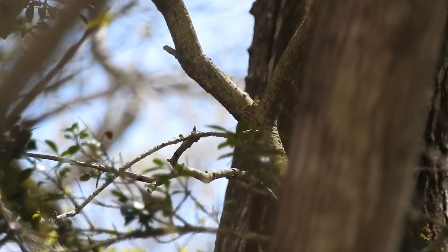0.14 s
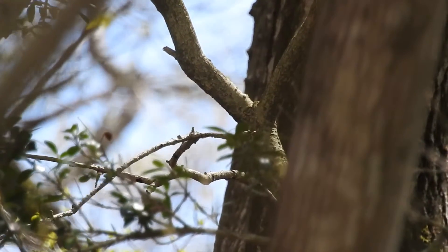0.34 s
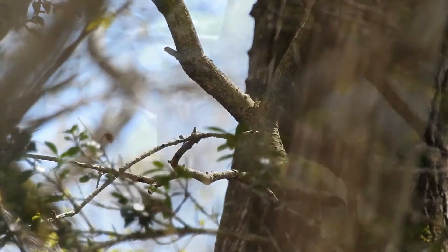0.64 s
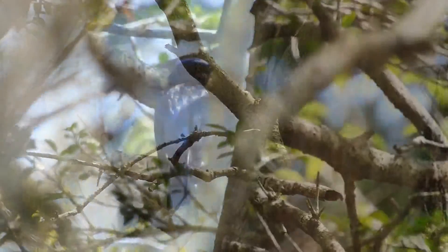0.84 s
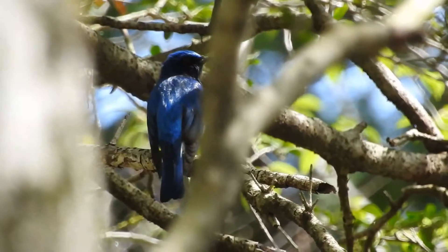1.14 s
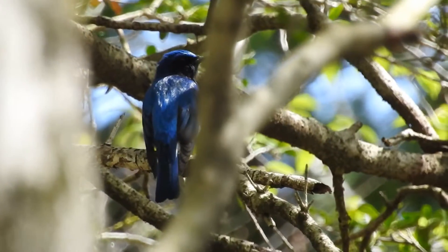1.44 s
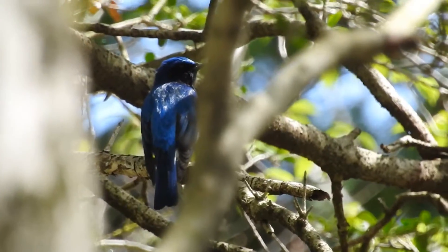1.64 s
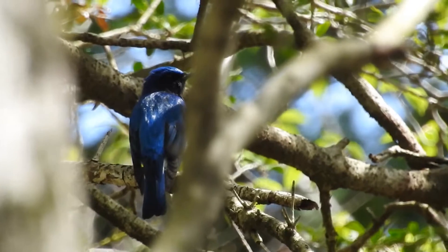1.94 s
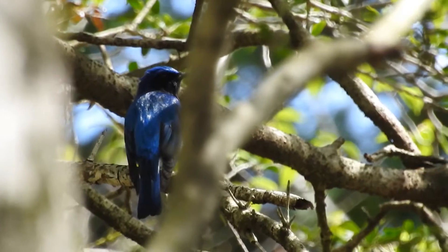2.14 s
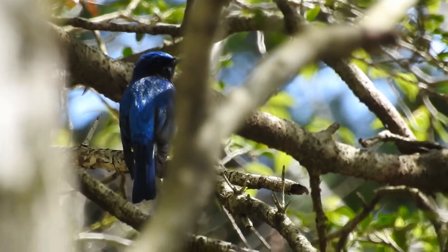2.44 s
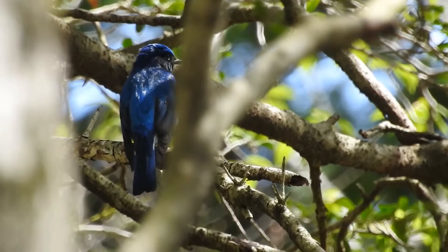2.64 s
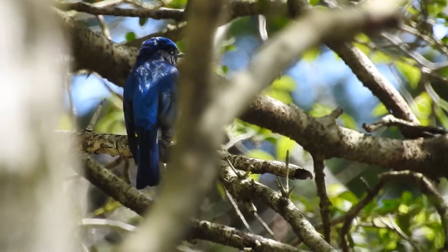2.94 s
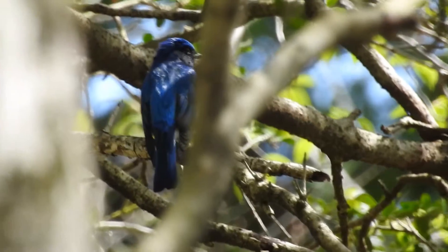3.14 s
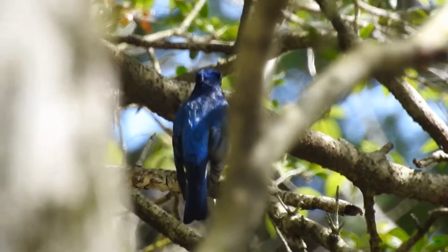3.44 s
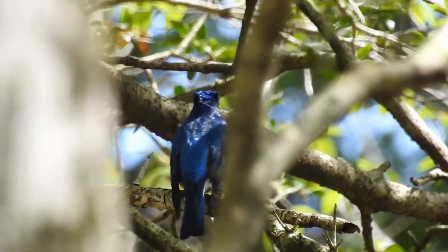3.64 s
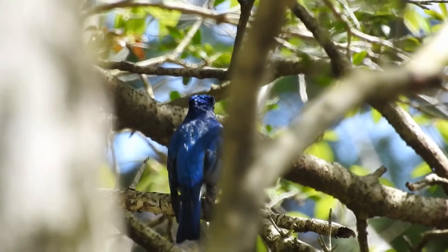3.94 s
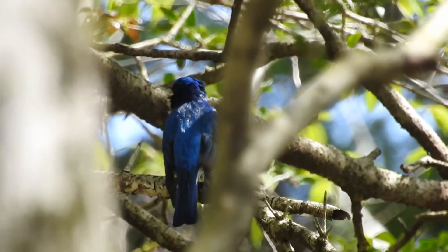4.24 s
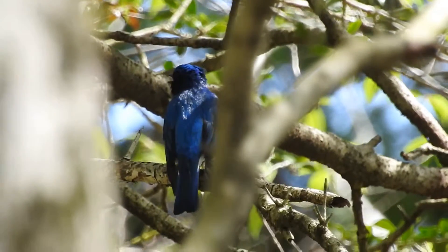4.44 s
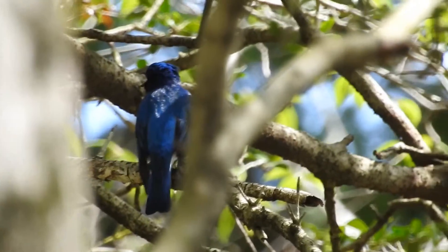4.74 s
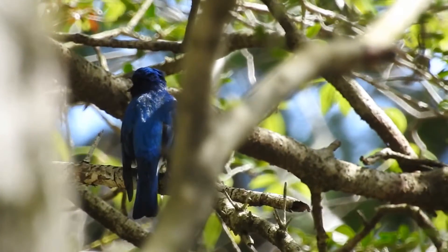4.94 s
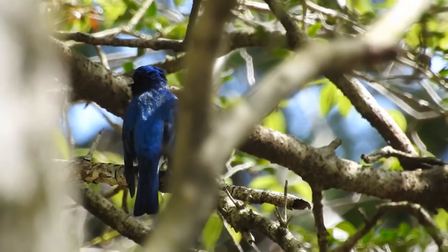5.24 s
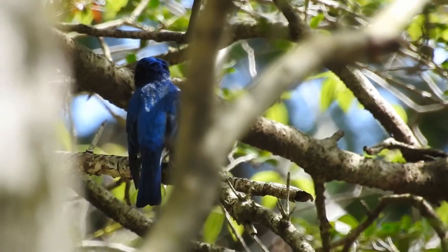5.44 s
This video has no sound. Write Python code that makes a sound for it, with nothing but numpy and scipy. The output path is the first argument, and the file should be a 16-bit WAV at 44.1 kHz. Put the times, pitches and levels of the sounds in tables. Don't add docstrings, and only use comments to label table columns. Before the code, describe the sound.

A warbler's hurried whistles give way to an echoing wood, where a blue flycatcher whistles a clear falling phrase ending in a thin buzz.

```python
import sys
import numpy as np
from scipy import signal
from scipy.io import wavfile
from scipy.ndimage import uniform_filter1d

SR = 44100
rng = np.random.default_rng(int(sys.argv[2]) if len(sys.argv) > 2 else 0)


def bounce(signal):
    frames = np.transpose(np.atleast_2d(signal))
    limited = np.clip(frames, -1, 1)
    pcm = np.round(limited * 32767).astype(np.int16)
    wavfile.write(sys.argv[1], SR, pcm)


def volts_from_decibels(level):
    exponent = np.asarray(level, float) / 20
    return 10 ** exponent


N = 246959


def evened(x):
    return x / np.sqrt(np.mean(x ** 2) + 1e-20)


def wobble(count, smooth):
    drift = uniform_filter1d(rng.standard_normal(count), size=smooth)
    return evened(uniform_filter1d(drift, size=smooth))


def read(points, hz):
    f, value = np.transpose(points)
    return np.interp(np.log(hz + 1), np.log(f + 1), value)


def level(curve, outside_db=-120):
    s, db = np.transpose(curve)
    return volts_from_decibels(np.interp(np.arange(N) / SR, s, db, outside_db, outside_db))


def add(mix, s, sound):
    part = mix[round(s * SR):][:len(sound)]
    part += sound[:len(part)]


def bursts(rows, quiet_db, edge_s):
    gain = np.zeros(N)
    for s, length, db in rows:
        add(gain, s, volts_from_decibels(db) * np.ones(round(length * SR)))
    return uniform_filter1d(gain, size=round(edge_s * SR)) + volts_from_decibels(quiet_db)


# f/Hz, likeness
LIKENESS = [(60, 1), (150, 0.91), (380, 0.67), (950, 0.48), (2380, 0.22), (5980, 0.098), (15000, 0.075)]


def air(spectrum, patchy_db, band=(0, 22050), size=1024):
    frames, hz = 4 * N // size + 5, np.fft.rfftfreq(size, 1 / SR)
    a, b, c, d, patches = rng.standard_normal((frames, len(hz), 5)).T
    patches = uniform_filter1d(patches, size=10, axis=0)
    patches = evened(uniform_filter1d(patches, size=12, axis=1))
    same = np.clip(read(LIKENESS, hz), -1, .9)[:, None]
    left = a + 1j * b
    right = same * left + np.sqrt(1 - same ** 2) * (c + 1j * d)
    tilt_db = read(spectrum, hz)
    power = volts_from_decibels(2 * tilt_db)
    share = power[(hz >= band[0]) & (hz <= band[1])].sum() / power.sum()
    z = np.array([left, right]) * volts_from_decibels(tilt_db[:, None] + patchy_db * patches)
    noise = signal.istft(z, nperseg=size, noverlap=3 * size // 4)[1][:, :N]
    return evened(noise) / np.sqrt(share)


# f/Hz, level/dB per Hz
WASH_SPECTRUM = [(59, -66), (100, -45), (140, -10.5), (210, -1), (275, -7.5), (359, -9), (1350, -21),
                 (2500, -37), (3250, -51), (5500, -120)]
# t/s, level/dB
WASH_LEVEL = [(0.0, -52.5), (0.024, -46.5), (.5, -47), (1.13, -49)]


def first_wash():
    return level(WASH_LEVEL) * air(WASH_SPECTRUM, 2.3, band=(120, 1500))


# f/Hz, level/dB per Hz
HISS_SPECTRUM = [(76, -37.5), (130, 0), (198, -6), (440, -17.5), (697, -16), (802, -20), (887, -30.5),
                 (2560, -26), (4300, -18), (6420, -18), (12200, -32.5), (14600, -35), (15500, -55.5)]
# t/s, level/dB
HISS_LEVEL = [(0, -55), (.5, -52.5), (1.15, -54), (5.6, -53.5)]


def hiss():
    return level(HISS_LEVEL) * air(HISS_SPECTRUM, 1.44)


# f/Hz, level/dB per Hz
RUMBLE_SPECTRUM = [(15, -49), (25, -31), (41, -6.5), (75, 0.5), (92, -1), (161, -18.5), (200, -10),
                   (260, -30), (440, -120)]
# t/s, level/dB
RUMBLE_LEVEL = [(0.0, -52), (0.11, -60.5), (0.25, -42), (0.33, -59), (0.67, -70), (1.34, -51.5),
                (2.06, -51.5), (2.09, -44), (2.23, -51), (2.4, -46.5), (2.48, -49.5), (3.71, -51.5),
                (3.79, -42), (3.82, -53.5), (4.57, -49), (5.6, -52)]


def rumble():
    noise = air(RUMBLE_SPECTRUM + [(400, -92.0)], 1.0, band=(40, 110), size=4096)
    return volts_from_decibels(0.64) * level(RUMBLE_LEVEL) * noise


# f/Hz, level/dB per Hz
LEAF_SPECTRUM = [(250, 5.5), (600, -2), (1500, -3.5), (3000, -8), (7000, -30), (12000, -21.5)]
# t/s, length/s, level/dB
LEAF_STIRS = [(1.13, 0.0644, -65), (1.27, 0.058, -66), (1.36, 0.047, -62), (1.44, 0.13, -64.5),
              (1.66, .03, -65), (1.73, 0.081, -69.5), (1.89, 0.16, -64), (2.23, 0.061, -63),
              (2.47, 0.074, -67), (2.56, 0.08, -62), (2.97, 0.056, -63.5), (3.07, 0.056, -64.5),
              (3.18, 0.046, -70), (3.46, 0.13, -65), (4.77, 0.024, -62), (4.89, 0.052, -65),
              (5.02, 0.048, -66), (5.13, 0.059, -62.5), (5.32, 0.037, -62), (5.51, 0.08, -60.5)]


def leaves():
    after_change = level([(1.1, -31), (1.14, 1.5), (5.6, 0)])
    stirs = bursts(LEAF_STIRS, quiet_db=-66, edge_s=0.03)
    return volts_from_decibels(-1.42) * after_change * stirs * air(LEAF_SPECTRUM, 2.7, band=(900, 2400))


# t/s, length/s, level/dB
HOOT_PUFFS = [(1.287, 0.048, -65), (1.448, 0.038, -63), (1.513, 0.041, -60), (1.641, 0.066, -65.5),
              (1.764, 0.023, -69), (1.937, 0.057, -66), (2.131, 0.031, -62), (2.226, 0.03, -61),
              (2.327, 0.035, -57.5), (2.408, 0.04, -65), (2.597, 0.033, -64), (2.665, 0.1, -71),
              (2.974, 0.069, -63), (3.086, 0.14, -61.5), (3.384, 0.25, -66.5), (3.62, 0.04, -67),
              (3.884, 0.046, -67.5), (4.345, 0.098, -66.5), (4.563, 0.033, -59.5), (4.857, 0.1, -66),
              (5.015, 0.044, -62), (5.108, 0.038, -71), (5.169, 0.077, -67.5), (5.361, 0.072, -66),
              (5.537, 0.054, -64)]


def hoot(hz=802, width_hz=25, steady=.5):
    r, turn = np.exp(-np.pi * width_hz / SR), np.exp(2j * np.pi * hz * np.arange(N) / SR)
    slow = signal.lfilter([1 - r], [1, -r], rng.standard_normal((N, 2)) @ [1, 1j])
    slow = slow / np.std(slow) + steady
    puffs = bursts(HOOT_PUFFS, quiet_db=-71.5, edge_s=0.023)
    return volts_from_decibels(-1.0) * puffs * evened((turn * slow).real)


# t/s, length/s, level/dB, f/Hz
KNOCKS = [
    (.0, 0.019, -45, 150),
    (.02, 0.017, -38, 166),
    (.046, 0.029, -44, 187.4),
    (.09, 0.016, -47, 164),
    (.108, 0.028, -50, 314),
]


def bump():
    out = np.zeros(N)
    for s, length, db, hz in KNOCKS:
        t = np.arange(0, length, 1 / SR)
        swell = 2 * np.sin(np.pi * t / length)
        add(out, s, volts_from_decibels(db) * swell * np.sin(2 * np.pi * hz * t))
    return out


# f/Hz, t60/s
TRUNK_RING = [(2500, 1.85), (4500, 1.57), (8000, 0.7)]


def wood(x, ring, build_s, branches_db=2.0, branches_t60=0.32, alike=0.31):
    taps = np.zeros((2, 2 * SR))
    at = np.arange(100, 2 * SR - 20, 20) + rng.integers(0, 20, (2, (2 * SR - 101) // 20))
    np.put_along_axis(taps, at, rng.choice([-1., 1.], at.shape), 1)
    taps[1] = alike * taps[0] + np.sqrt(1 - min(alike, 1) ** 2) * taps[1]
    hz, t, z = signal.stft(taps, SR, nperseg=256)
    trunks = volts_from_decibels(-60 * t / (ring * read(TRUNK_RING, hz)[:, None]))
    branches = volts_from_decibels(branches_db - 60 * t / branches_t60)
    build = 1 - np.exp(-t / build_s)
    tail = signal.istft(z * (trunks + branches) * build, SR, nperseg=256)[1]
    echoes = signal.fftconvolve(x[None], tail / np.linalg.norm(tail[0]), axes=1)[:, :N]
    return echoes * volts_from_decibels(1.7 * wobble(N, smooth=280))


def placed(x, pan_db, wet_db, ring, alike=0.46, blur=.6, build_s=.008):
    smeared = x * (np.sqrt(1 - blur ** 2) + blur * wobble(N, smooth=160))
    heard = x + volts_from_decibels(wet_db) * wood(smeared, ring, build_s, alike=alike)
    return heard * volts_from_decibels([[pan_db / 2], [-pan_db / 2]])


# f/Hz, level/dB
OCTAVE = [(3300, -30.5), (4400, -50), (6000, -43)]


def whistle(rows, waver=0.0023, flutter_db=2.0, trill=0):
    s, hz, db = np.transpose(rows)
    t = np.arange(s[0], s[-1], 1 / SR)
    glide = uniform_filter1d(np.interp(t, s, hz), size=130, mode="nearest")
    bend = waver * wobble(len(t), smooth=220) + trill * wobble(len(t), smooth=50)
    turn = 2 * np.pi * np.cumsum(glide * (1 + bend)) / SR
    overtones = np.sin(2 * turn) + .3 * np.sin(3 * turn)
    tone = np.sin(turn) + volts_from_decibels(read(OCTAVE, glide)) * overtones
    loud = volts_from_decibels(np.interp(t, s, db) + flutter_db * wobble(len(t), smooth=350))
    edges = signal.windows.tukey(len(t), min(1, 200 / len(t)))
    return s[0], np.sqrt(2) * tone * loud * edges


def flock(songs, trill, wet_db, ring, pan_db=-2.0):
    voice = np.zeros(N)
    for syllable, calls in songs:
        usual_hz = syllable[0][0][1]
        for s, db, hz in calls:
            for stroke in syllable:
                rows = np.array(stroke) * [1, hz / usual_hz, 1] + [s, 0, db]
                add(voice, *whistle(rows, waver=0.0043, flutter_db=2.5, trill=trill))
    return placed(voice, pan_db, wet_db, ring)


# t/s after the start, f/Hz, level/dB
TWIRL_SHAPE = [
    [(-.01, 4300, -9), (-.004, 4280, -6), (.002, 4150, -9), (.004, 4000, -16)],
    [(.002, 4300, -12), (.008, 5050, -6), (.018, 5400, -9), (.021, 5450, -16)],
    [(.015, 3900, -18), (.021, 4500, -8), (.027, 4850, -1), (.036, 5030, 0), (.047, 5480, -3),
     (.054, 5400, -2), (.062, 4950, -6)],
    [(.05, 5850, -16), (.06, 6050, -8), (.067, 6180, -4), (.075, 5750, -5), (.083, 5100, -3),
     (.092, 4650, -11)],
]
LIFT_SHAPE = [
    [(0, 3500, -8), (.03, 3900, -6), (.036, 3950, -18), (.043, 4150, 0), (.1, 4200, -2), (.2, 4270, -9),
     (.245, 4280, -5), (.26, 4290, -12)],
]
LILT_SHAPE = [
    [(0, 3200, -11), (.012, 3320, -8), (.03, 3580, -7), (.042, 3730, 0), (.054, 3750, -2), (.062, 3500, -6),
     (.07, 3400, -14)],
]
TSIP_SHAPE = [
    [(0, 6520, -16), (.008, 7300, -3), (.016, 7500, 0), (.024, 7100, -5), (.034, 6450, 2), (.044, 6900, -5),
     (.066, 6950, 1), (.085, 6800, -8)],
]
FALL_SHAPE = [
    [(0, 5250, -5), (.014, 5250, -8)],
    [(.02, 4900, -8), (.042, 4420, 0), (.06, 4060, -2), (.08, 4450, -7), (.1, 4150, -6), (.14, 4050, -11)],
    [(.09, 3200, -10), (.11, 3600, -7), (.13, 3300, -9), (.16, 3750, -9), (.19, 3400, -16)],
]
RISE_SHAPE = [
    [(0, 2950, -15), (.018, 3200, -8), (.04, 3480, -6), (.065, 3760, 0), (.09, 3720, -6)],
]
SLIDE_SHAPE = [
    [(0, 5050, -3), (.04, 4950, 0), (.1, 4700, -2), (.13, 4600, -10)],
]
PIPE_SHAPE = [
    [(0, 4270, 6), (.04, 4200, 0), (.1, 4250, 0), (.12, 4300, -14)],
]
DROP_SHAPE = [
    [(0, 4075, 2), (.012, 3400, 6), (.02, 3330, 0), (.05, 3400, -4), (.09, 3350, -8)],
]
WISP_SHAPE = [
    [(0, 5980, -5), (.03, 6620, 1), (.07, 7200, -7.5), (.1, 6800, -25)],
]
# t/s, level/dB, first f/Hz
TWIRL_CALLS = [(3.282, -44, 4280), (3.895, -43, 4300), (4.512, -41.5, 4190)]
LIFT_CALLS = [(2.725, -55.5, 3510)]
LILT_CALLS = [(3.399, -46.5, 3180)]
TSIP_CALLS = [(2.949, -57, 6500), (3.113, -55, 6490), (3.549, -51.5, 6430), (3.717, -53.5, 6500),
              (4.165, -49, 6500), (4.334, -53.5, 6520)]
FALL_CALLS = [(1.558, -56.5, 5250), (2.112, -56.5, 5200), (2.54, -64, 5150), (4.82, -56, 5200),
              (5.29, -54.5, 5230)]
RISE_CALLS = [(3.985, -53, 2880), (4.625, -53, 2874)]
SLIDE_CALLS = [(4.155, -57, 5060), (4.35, -62.5, 5100)]
FAINT_PIPE_CALLS = [(1.46, -69.5, 3480), (1.78, -72.5, 4480), (1.97, -76.5, 4470), (1.125, -67.5, 4210),
                    (1.14, -70, 3550), (2.42, -73.5, 4116), (2.6, -88, 4900),
                    (2.815, -73, 2760), (3.01, -72, 4520)]
DROP_CALLS = [(2.804, -61, 4074)]
WISP_CALLS = [(1.37, -60, 6020), (1.889, -63, 5900), (2.8, -65.5, 5650), (4.628, -60.5, 6050),
              (5.551, -64.5, 6020)]


def neighbours():
    near_songs = [(TWIRL_SHAPE, TWIRL_CALLS), (LIFT_SHAPE, LIFT_CALLS), (LILT_SHAPE, LILT_CALLS)]
    far_songs = [(FALL_SHAPE, FALL_CALLS), (RISE_SHAPE, RISE_CALLS), (SLIDE_SHAPE, SLIDE_CALLS)]
    farther_songs = [(PIPE_SHAPE, FAINT_PIPE_CALLS), (DROP_SHAPE, DROP_CALLS)]
    near = flock(near_songs, trill=.006, wet_db=-4, ring=.6)
    middle = flock([(TSIP_SHAPE, TSIP_CALLS)], trill=.012, wet_db=4, ring=1.0)
    far = flock(far_songs, trill=.011, wet_db=1, ring=.55)
    farther = flock(farther_songs, trill=.042, wet_db=6, ring=.3)
    farthest = flock([(WISP_SHAPE, WISP_CALLS)], trill=.06, wet_db=9, ring=.4)
    return near + middle + far + farther + farthest


def hook(start, length, db, top_hz, last_hz, scoop, scoop_s):
    peak, start_db, end_db = .45, -8, -10
    t = np.linspace(0, length, num=30)
    up = np.clip(1 - t / (scoop_s + 1 / SR), 0, 1) ** 2
    slide = np.clip((t - scoop_s) / (length - scoop_s), 0, 1)
    hz = (top_hz + (last_hz - top_hz) * slide) * (1 - scoop * up)
    away = t / length - peak
    arch_db = np.where(away < 0, start_db * (away / peak) ** 2, end_db * (away / (1 - peak)) ** 2)
    return np.transpose([start + t, hz, db + arch_db])


# t/s, length/s, level/dB, top f/Hz, last f/Hz
HOOK_NOTES = [(.305, 0.013, -53, 5800, 5600), (.331, 0.031, -45, 4750, 4660),
              (.425, 0.017, -40.5, 4680, 4740), (.45, 0.056, -40, 4200, 4200),
              (.632, 0.029, -41.5, 4420, 4400), (.708, 0.036, -36, 4230, 4196),
              (.984, 0.15, -54, 7550, 7430)]
SWOOP_NOTES = [
    (.543, 0.036, -39, 3690, 3100),
    (.74, 0.073, -39.5, 3790, 2873),
]
GRACE_NOTES = [(.314, 0.019, -54, 4220, 4360), (.322, 0.01, -49, 5850, 4500),
               (.33, 0.027, -51.5, 5730, 5747), (.35, .034, -40, 4880, 4930),
               (.397, 0.012, -47, 4970, 4930), (.412, .018, -52, 4800, 4860),
               (.763, 0.011, -38, 3500, 3300), (.437, 0.013, -48, 4070, 3770),
               (.507, 0.022, -37, 4710, 4760), (.522, 0.023, -35, 4770, 4250),
               (.545, 0.015, -40, 4570, 4830), (.592, 0.015, -50, 3190, 3210),
               (.615, .025, -52, 4680, 4720), (.662, 0.011, -43, 4370, 4250),
               (.672, 0.014, -39, 3870, 4100), (.728, 0.019, -40, 4220, 3710),
               (.742, 0.018, -38, 4225, 4200), (.838, 0.0094, -38, 4260, 4550),
               (.85, 0.044, -46, 4215, 3800), (1.08, .016, -56, 4200, 4020),
               (1.092, 0.0071, -68, 3920, 3580), (1.098, 0.0099, -50, 4080, 5150),
               (1.103, 0.009, -45, 5140, 5000), (1.112, 0.02, -54, 3790, 3950)]
RASP_NOTES = [
    (.83, 0.07, -55, 5700, 5520),
    (.98, 0.043, -49, 4650, 4570),
    (.985, 0.073, -57, 6050, 5930),
]
# t/s, gain level/dB
FIRST_SHOT_LEVEL = [(0, -1), (.7, 0), (.9, -2), (1.135, 0)]


def warbler():
    voice = np.zeros(N)
    # notes, scoop depth (share of pitch), scoop time (s), trill
    kinds = [(HOOK_NOTES, .16, .008, .007), (SWOOP_NOTES, .27, .012, .016),
             (GRACE_NOTES, 0, 0, .007), (RASP_NOTES, 0, 0, .04)]
    for notes, scoop, scoop_s, trill in kinds:
        for row in notes:
            add(voice, *whistle(hook(*row, scoop, scoop_s), waver=.003, flutter_db=2.2, trill=trill))
    return placed(voice, pan_db=-0.17, wet_db=-0.5, ring=0.56) * level(FIRST_SHOT_LEVEL)


def note(start, length, db, first_hz, held_hz, swell=False):
    leap_s, sink_s, attack_s, release_s, edge_db = 0.0045, 0.0074, 0.0047, 0.0097, -16.5
    t = np.linspace(0, length, num=40)
    left_s = length - t
    hz = held_hz + (first_hz - held_hz) * np.exp(-t / (leap_s if first_hz < held_hz else sink_s))
    if held_hz > 1.03 * first_hz:
        hz = hz * (1 - .025 * np.exp(-t / .02))
    droop = .055 if swell else .015
    hz = hz * (1 - droop * np.clip(1 - left_s / .018, 0, 1) ** 2)
    if swell:
        shape_db = -31.5 * np.clip(1 - t / length, 0, 1) ** 2
    else:
        shape_db = edge_db * np.clip(1 - t / attack_s, 0, 1)
        if length > .09:
            shape_db = shape_db - 5 * np.cos(np.pi * 22.6 * t) ** 2
    ending_db = edge_db * np.clip(1 - left_s / release_s, 0, 1)
    return np.transpose([start + t, hz, db + shape_db + ending_db])


# t/s, centre f/Hz, effort level/dB
BUZZ_EFFORT = [
    (4.827, 7300, -51),
    (4.833, 7320, -42),
    (4.862, 7200, -42),
    (4.921, 7290, -45.5),
    (4.979, 7130, -37),
    (5.019, 7340, -47),
    (5.073, 7400, -44),
    (5.135, 7180, -35.5),
    (5.191, 7150, -57),
]


def buzz(jitter=.07, pulsing=.55, tilt=.9, uneven_db=2.6):
    rate_hz, lowest_hz = 266, 6505
    s, centre_hz, effort_db = np.transpose(BUZZ_EFFORT)
    t = np.arange(s[0], s[-1], 1 / SR)
    db = np.interp(t, s, effort_db)
    hz = np.interp(t, s, centre_hz)
    sweep = hz - lowest_hz
    beat = 2 * np.pi * np.cumsum(rate_hz * (1 + jitter * wobble(len(t), smooth=150))) / SR
    tone = np.sin(2 * np.pi * np.cumsum(hz + sweep * np.cos(beat)) / SR)
    puffs = (1 + pulsing * np.cos(beat - tilt)) * volts_from_decibels(uneven_db * wobble(len(t), smooth=90))
    return s[0], volts_from_decibels(db) * evened(tone * puffs)


# t/s, length/s, level/dB, first f/Hz, held f/Hz
SWELL_NOTES = [
    (3.544, 0.069, -34, 5760, 6000),
]
HELD_NOTES = [
    (4.16, 0.14, -35.5, 4380, 4110),
    (4.553, .02, -44, 4290, 4330),
    (3.997, 0.014, -31, 4310, 4330),
]
# t/s, f/Hz, level/dB
DIVE_NOTE = [(3.612, 5750, -52), (3.624, 5600, -45.5), (3.636, 5430, -35), (3.65, 5306, -28),
             (3.662, 5318, -24.5), (3.672, 5310, -24.5), (3.676, 5315, -33), (3.682, 5250, -25),
             (3.696, 5190, -37)]
DROOPING_NOTE = [(3.676, 5160, -39), (3.686, 5040, -40), (3.7, 4880, -48)]
LONG_NOTE = [(3.701, 4137, -54), (3.708, 4293, -39), (3.717, 4370, -49), (3.735, 4378, -27.5),
             (3.753, 4433, -38), (3.785, 4380, -23), (3.806, 4410, -29.5), (3.83, 4390, -22.5),
             (3.855, 4403, -29), (3.882, 4382, -24), (3.891, 4370, -44)]
UNDER_NOTE = [(3.838, 4328, -51), (3.85, 4340, -32), (3.9, 4328, -32.5), (3.945, 4325, -33),
              (3.966, 4322, -35), (3.974, 4270, -45)]
LEAP_NOTE = [(4.095, 2570, -48.5), (4.101, 3070, -34), (4.108, 3394, -23), (4.119, 3410, -25),
             (4.129, 3410, -21), (4.145, 3440, -25.5), (4.162, 3447, -25), (4.171, 3340, -40)]
PULSED_NOTES = [
    [(4.344, 4110, -54), (4.355, 4061, -41), (4.364, 4065, -46), (4.373, 4070, -41), (4.383, 4068, -54),
     (4.393, 4064, -44), (4.412, 4058, -43), (4.432, 4054, -41), (4.442, 4050, -54)],
    [(4.503, 3470, -48), (4.512, 3535, -36), (4.522, 3547, -31.5), (4.54, 3545, -40), (4.561, 3545, -31.5),
     (4.58, 3546, -43), (4.595, 3550, -35), (4.608, 3530, -52)],
    [(4.572, 4330, -50), (4.582, 4320, -41), (4.594, 4305, -34), (4.601, 4310, -42), (4.608, 4320, -38),
     (4.618, 4300, -50)],
]


def flycatcher():
    voice, rasp = np.zeros((2, N))
    phrase = [note(*row, swell=True) for row in SWELL_NOTES]
    phrase += [note(*row) for row in HELD_NOTES]
    phrase += [DIVE_NOTE, DROOPING_NOTE, LONG_NOTE, UNDER_NOTE, LEAP_NOTE] + PULSED_NOTES
    for rows in phrase:
        add(voice, *whistle(rows, waver=.0009, flutter_db=.8, trill=.0022))
    add(rasp, *buzz())
    whistles = placed(voice, pan_db=-2.1, wet_db=-6.5, ring=0.67, alike=0.61, blur=0.48, build_s=0.027)
    return whistles + placed(rasp, pan_db=-2.5, wet_db=1.5, ring=0.6, alike=0.11, blur=0.44)


def scene():
    noises = (first_wash() + hiss() + leaves() + rumble()) * volts_from_decibels([[-.4], [.4]])
    ambience = noises + hoot() + bump() * volts_from_decibels([[2.5], [-2.5]])
    return ambience + neighbours() + warbler() + flycatcher()


def top_cut(x):
    return signal.sosfilt(signal.butter(12, 15700, fs=SR, output="sos"), x)


def record(dry):
    mix = signal.sosfilt(signal.butter(3, 38, "high", fs=SR, output="sos"), dry)
    return top_cut(mix)


dry = scene()
out = record(dry)
bounce(out)
```